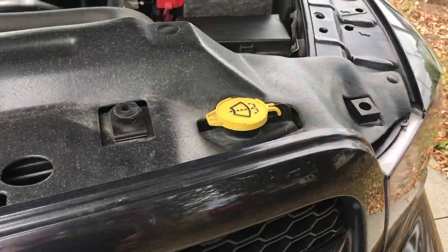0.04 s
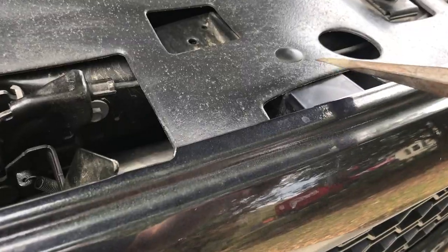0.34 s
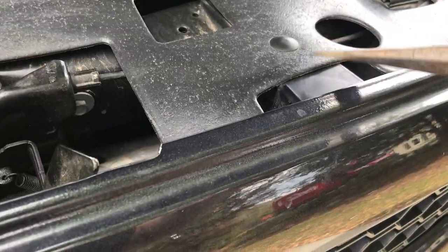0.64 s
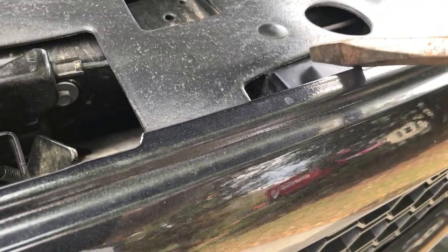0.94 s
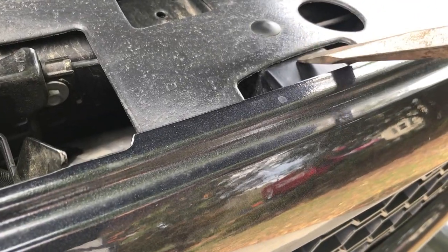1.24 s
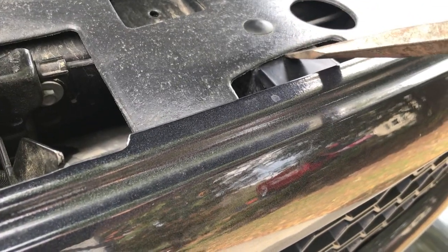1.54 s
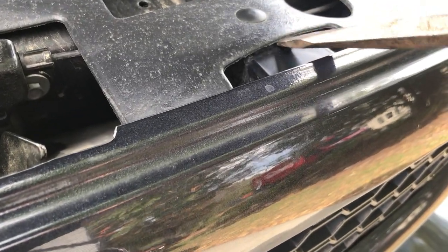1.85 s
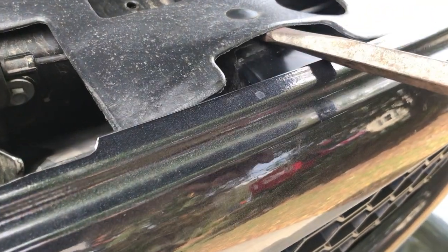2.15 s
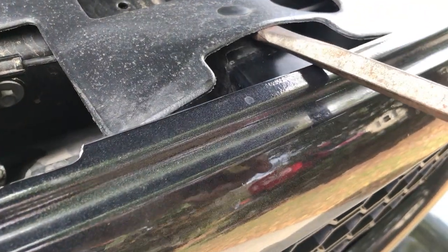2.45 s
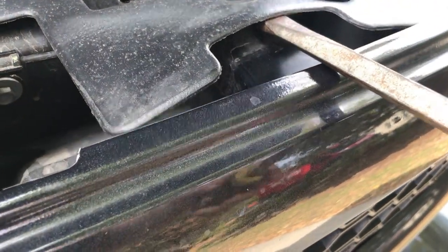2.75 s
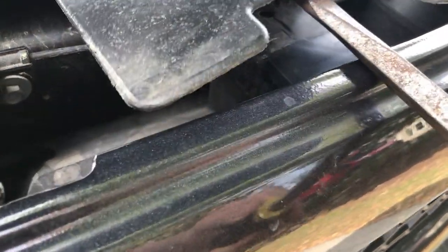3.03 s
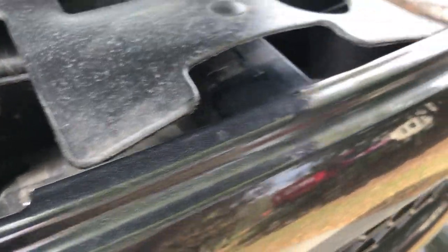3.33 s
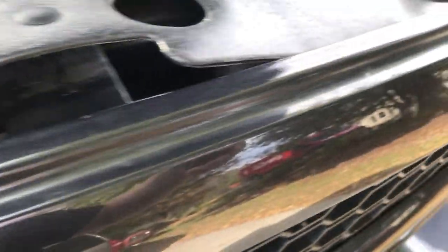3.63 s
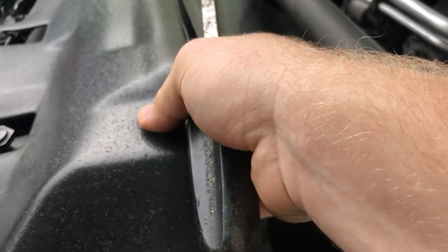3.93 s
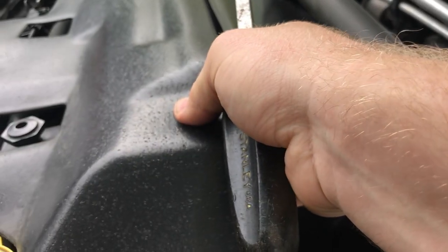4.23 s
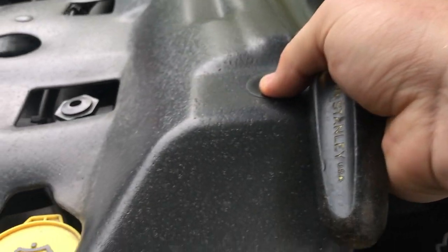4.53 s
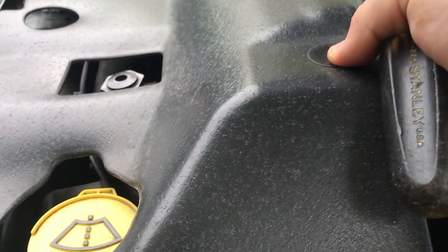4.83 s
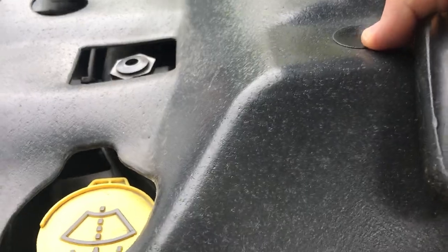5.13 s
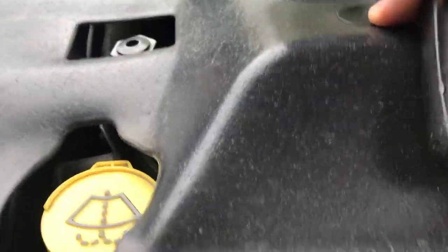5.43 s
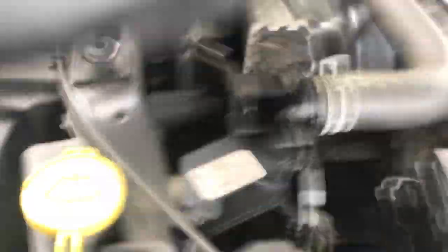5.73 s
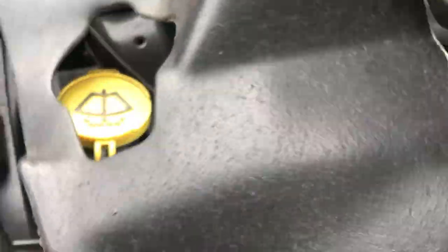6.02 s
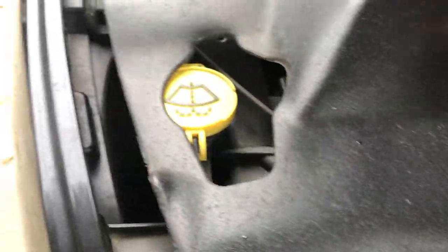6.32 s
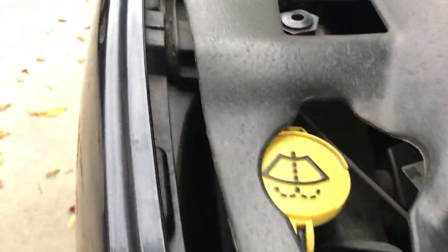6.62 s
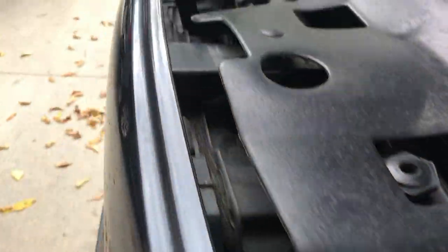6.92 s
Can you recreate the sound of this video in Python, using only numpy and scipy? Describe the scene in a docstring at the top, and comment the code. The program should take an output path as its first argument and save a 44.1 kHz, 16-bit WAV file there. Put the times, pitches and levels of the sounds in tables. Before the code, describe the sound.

Close to the microphone, a screwdriver clacks and lightly scrapes against a plastic cover in a car's engine bay. A clip lets go with a loud snap, and more sharp clicks follow. The panel rumbles as it bends, then is dragged up with loud hollow thumps and a brief squeak, ending in a few more snaps. Soft outdoor air and a faint distant engine drone lie underneath.

```python
"""Sharp clacks, gritty scrapes, snaps and hollow thumps sound close by, over outdoor air and a low drone. A
screwdriver is prying a plastic cover off the front of a car's engine bay. Its blade knocks on the panel, the
clips snap out, and the freed cover is dragged up, booming like a slack drum. The panel rumbles as a hand bends
it; the drone comes from a far engine."""
import sys
import numpy as np
from scipy import signal
from scipy.fft import rfft, irfft
from scipy.io import wavfile
from scipy.ndimage import map_coordinates

SR = 44100
rng = np.random.default_rng(int(sys.argv[2]) if len(sys.argv) > 2 else 0)


def generate_wav(signal):
    """Clip the signal to [-1, 1] and save it as 16-bit WAV at the path in sys.argv[1]."""
    frames = np.transpose(np.atleast_2d(signal))
    scaled = np.clip(frames, -1, 1) * 32767
    pcm = np.round(scaled).astype(np.int16)
    wavfile.write(sys.argv[1], SR, pcm)


N = 307377

# the tones a plastic clip rings with: f/Hz, level/dB, base t60/s (t60 is the time to fade by 60 dB)
CLIP_TONES = [(229.7, -2, 0.12), (356, -3, 0.104), (436, -8, 0.091), (672, -5, 0.0334), (1006, 0, 0.13),
              (1354, 10, 0.04), (1917, -13, 0.11), (2640, 0.5, 0.037), (3230, 5.5, 0.024),
              (4330, -2.5, 0.013)]
# the tone colour of struck plastic: f/Hz, level/dB
PLASTIC_COLOUR = [(60, -2), (150, 1.5), (280, 1.5), (900, 1), (2000, 3), (3800, -2), (5500, -9),
                  (8000, -11.5), (10300, -17.5), (12500, -14), (16000, -25.5)]


def amp(db):
    """Turn decibels into a gain."""
    return 10 ** (np.asarray(db) / 20)


def unit(x):
    """Scale x to an average (rms) strength of 1."""
    return x / np.sqrt(np.mean(x ** 2) + 1e-20)


def along(points, hz):
    """Read between (frequency, value) points on a pitch scale."""
    freqs, values = np.transpose(points)
    return np.interp(np.log(hz + 1), np.log(freqs + 1), values)


def wobble(rate):
    """A smooth curve through rate random points a second."""
    knots = rng.standard_normal(int(N * rate / SR) + 4)
    grid = np.arange(0, len(knots) - 1, 1 / 10)
    return np.interp(np.arange(N) * rate / SR, grid, map_coordinates(knots, [grid]))


def coloured(x, colour):
    """Give x a tone colour, at strength 1."""
    gain = amp(along(colour, np.fft.rfftfreq(len(x), 1 / SR)))
    return unit(irfft(rfft(x) * gain, len(x)))


def noise(colour, size=N):
    """Steady noise with a tone colour."""
    return coloured(rng.standard_normal(size), colour)


def add(track, s, sound):
    """Mix a sound into the track at s seconds."""
    start = round(s * SR)
    track[start:start + len(sound)] += sound[:max(N - start, 0)]


def strokes(rows, rise_db_per_s, fall_db_per_s):
    """A gain curve: each stroke swells, holds for its length and dies away."""
    t = np.arange(N) / SR
    return sum(amp(db - rise_db_per_s * np.clip(s - t, 0, 1)
                   - fall_db_per_s * np.clip(t - s - length, 0, 1)) for s, length, db in rows)


def air():
    """Outdoor air: a rumble, a soft distant wash and a thin hiss, each wavering a little."""
    # tone colours of the three layers: f/Hz, level/dB
    rumble_colour = [(20, -23.5), (40, -3.5), (60, 11), (90, 3), (140, 0.5), (220, -5.5), (320, -13.5),
                     (600, -46.5)]
    wash_colour = [(150, -23), (330, 2.5), (600, -1.5), (1100, 0.5), (1800, -4), (2800, -13.5), (5000, -27)]
    hiss_colour = [(1500, -5), (3000, 2.5), (6000, -0.5), (9000, -5), (10300, -11), (12000, -8),
                   (15500, -19.5), (16300, -30)]
    # the air at each place the microphone stands: start t/s, rumble/dB, wash/dB, hiss/dB
    places = [(0, -53.5, -63, -54), (0.114, -46, -61, -61.5), (3.33, -45.5, -61.5, -64),
              (3.81, -45.5, -55, -60.5), (5.05, -49, -52, -62)]
    starts, *levels = np.transpose(places)
    place = np.searchsorted(starts[1:], np.arange(N) / SR)
    rumble_db, wash_db, hiss_db = np.array(levels)[:, place]
    rumble = amp(rumble_db + 1.1 * wobble(7)) * noise(rumble_colour)
    wash = amp(wash_db + 1.4 * wobble(2.2)) * noise(wash_colour)
    hiss = amp(hiss_db + 1.5 * wobble(9)) * noise(hiss_colour)
    return rumble + wash + hiss


def drone(hz):
    """Only an engine's lowest tones carry this far, each wavering on its own."""
    # engine tones: multiple of the firing rate, level/dB
    tones = [(0.499, -11.5), (1, 0.5), (1.498, -34), (1.75, -14.5), (2, -29.5)]
    phase = 2 * np.pi * np.cumsum(hz * (1 + 0.0159 * wobble(25))) / SR
    return unit(sum(amp(db + 1.64 * wobble(8.3)) * np.sin(k * phase) for k, db in tones))


def far_engine():
    """The revs climb, then sink at a gear change; later the engine holds a higher speed."""
    # pulling and changing gear: t/s, firing f/Hz, level/dB
    revs = [(.14, 108.7, -44.5), (1.5, 117.6, -41.5), (2.6, 130.4, -48), (3.1, 129.2, -46.5),
            (3.4, 104.9, -44), (3.8, 103.3, -37)]
    # steady higher revs: t/s, length/s, firing f/Hz, level/dB
    cruise = (6.5, .55, 171, -52)
    times, *columns = np.transpose(revs)
    hz, db = [np.interp(np.arange(N) / SR, times, column) for column in columns]
    fade = strokes([(times[0], times[-1] - times[0], 0)], rise_db_per_s=500, fall_db_per_s=500)
    pulling = amp(db) * fade * drone(hz)
    s, length, cruise_hz, cruise_db = cruise
    swell = strokes([(s, length, cruise_db)], rise_db_per_s=40, fall_db_per_s=45)
    return pulling + swell * drone(cruise_hz)


def friction(colour, grain_db, catch_db):
    """Countless tiny slips of unequal size, bunched where the surfaces catch."""
    slips = rng.standard_normal(N) * amp(grain_db * wobble(1500) + catch_db * wobble(130))
    return coloured(slips, colour)


def flexing():
    """The panel rumbles as the hand bends it."""
    # bends: t/s, length/s, level/dB
    bends = [(2.84, 0.034, -30.5), (2.99, 0.043, -39), (3.8, .12, -43), (4.04, .01, -38),
             (4.155, .025, -31.5), (4.29, .035, -29), (4.41, 0.045, -40), (4.7, .02, -45),
             (4.94, 0.067, -33.5), (5.15, 0.07, -46.5), (5.46, 0.013, -32.5), (5.56, 0.073, -22.5),
             (5.64, 0.0092, -11), (5.74, 0.012, -17), (5.83, 0.058, -26.5)]
    # their deep tone colour: f/Hz, level/dB
    colour = [(20, -11), (45, 3.5), (80, 5), (130, -1), (200, -3), (330, -13.5), (550, -25.5), (1000, -35),
              (2000, -94)]
    gain = strokes(bends, rise_db_per_s=597, fall_db_per_s=334)
    return gain * friction(colour, grain_db=1, catch_db=3)


def dragging():
    """The cover drags over its seat, plastic on plastic."""
    # slides: t/s, length/s, level/dB
    slides = [(2.845, .045, -30.5), (5.47, 0.014, -37), (5.558, 0.0085, -23.5), (5.624, .011, -20.5),
              (5.684, 0.028, -32), (5.74, 0.0093, -41), (5.98, 0.071, -46.5), (6.17, .1, -49),
              (6.3, .085, -45)]
    # their tone colour: f/Hz, level/dB
    colour = [(150, -27.5), (480, 2), (950, 0), (1250, -0.5), (2000, -6.5), (3100, -9), (5000, -15),
              (9000, -23), (11000, -26.5), (16000, -29)]
    gain = strokes(slides, rise_db_per_s=1101, fall_db_per_s=480)
    return gain * friction(colour, grain_db=4.5, catch_db=3.0)


def scraping():
    """Gritty scrapes, each ringing with a few thin tones."""
    # light scrapes: t/s, length/s, level/dB
    scrapes = [(.085, 0.011, -48.5), (1.42, 0.017, -56), (1.665, 0.048, -61), (1.945, 0.2, -49.5),
               (4.14, 0.14, -61.5), (4.85, 0.085, -60)]
    # the grit's tone colour and the tones it rings with: f/Hz, level/dB
    colour = [(240, -20), (400, 5), (520, 1.5), (570, 4), (742, 2), (1110, 1.5), (1220, -2.5), (1710, -3),
              (2360, -3.5), (5190, -3.5), (6740, -9), (8240, -12), (10100, -14.5), (13300, -13),
              (16000, -18)]
    singing_tones = [(1750, 0), (5330, -2), (8400, -3.5), (13800, -3.5)]
    grit = friction(colour, grain_db=4.0, catch_db=-0.2)
    song = sum(amp(db) * unit(signal.lfilter(*signal.iirpeak(hz, Q=18, fs=SR), grit))
               for hz, db in singing_tones)
    gain = strokes(scrapes, rise_db_per_s=1200, fall_db_per_s=1500)
    return gain * (grit + amp(-6) * unit(song))


def squeaks():
    """Plastic sticks and slips, making rough tones that swell and fade."""
    # chafing spots: t/s, length/s, f/Hz, level/dB
    chafes = [(1.17, .14, 724, -59.5), (1.641, .1, 1740, -62), (4.55, 0.098, 185, -43.5),
              (4.83, 0.091, 515, -56.5), (4.864, 0.075, 2040, -63), (4.865, 0.077, 1470, -58),
              (5.149, 0.029, 428, -46), (5.606, 0.028, 1760, -31), (5.627, 0.019, 1160, -19.5),
              (5.674, 0.046, 2820, -35)]
    track = np.zeros(N)
    for s, length, hz, db in chafes:
        size = round(length * SR)
        tone = signal.lfilter(*signal.iirpeak(hz, Q=13, fs=SR), rng.standard_normal(size))
        add(track, s, amp(db) * unit(np.hanning(size) * tone))
    return track


def dense_ring(t, stretch, bay_db, bay_stretch):
    """The panel's crowded tones, treble dying first, with a weak, slower answer from the engine bay."""
    # how long the plastic rings: f/Hz, base t60/s
    ring_times = [(150, 0.25), (500, 0.13), (1500, 0.086), (4000, 0.054), (8000, 0.05), (15000, .025)]
    hz = np.fft.rfftfreq(len(t), 1 / SR)
    spectrum = np.exp(2j * np.pi * rng.random(len(hz))) * amp(along(PLASTIC_COLOUR, hz))
    centres = np.geomspace(100, 16000, 9)
    ring = np.zeros(len(t))
    for centre, pick in zip(centres, np.eye(len(centres))):
        band = irfft(spectrum * along(np.transpose([centres, pick]), hz), len(t))
        t60 = along(ring_times, centre)
        fade = amp(-60 * t / (t60 * stretch)) + amp(bay_db - 60 * t / (t60 * bay_stretch))
        # each band keeps its fair share of the energy
        ring += unit(band * fade) * np.std(band) * np.sqrt(np.mean(fade ** 2))
    return unit(ring)


def blow(part_tones, stretch, tones_db, crack_db, crack_t60):
    """One hit: the part's strong tones, a brief crack and the dense ring; stretch scales the ring time."""
    t = np.arange(SR // 5) / SR
    stretch = max(stretch, .2)
    hz, db, t60 = np.transpose(part_tones)[:, :, None]
    strength = amp(db + 1.5 * rng.standard_normal(hz.shape)) * rng.choice([-1, 1], hz.shape)
    tones = np.sum(strength * amp(-60 * t / (t60 * stretch)) * np.sin(2 * np.pi * hz * t), axis=0)
    crack = noise(PLASTIC_COLOUR, len(t)) * amp(-60 * t / crack_t60)
    ring = dense_ring(t, stretch, bay_db=-23.5, bay_stretch=2.44)
    return ring + amp(tones_db) * unit(tones) + amp(crack_db) * unit(crack)


def balance(hit, bass_db, middle_db, treble_db):
    """Set how strong a hit's bass, middle and treble are over its first 30 ms."""
    edges_hz = [(150, 500), (500, 4500), (4800, 19000)]
    first = round(.03 * SR)
    bands = [signal.sosfilt(signal.butter(3, e, 'band', fs=SR, output='sos'), hit) for e in edges_hz]
    levels = bass_db, middle_db, treble_db
    return sum(amp(db) * band / np.std(band[:first]) for band, db in zip(bands, levels))


def spot_tone(hz, t60_at_1khz):
    """The tone that one struck spot favours; low ones ring longer."""
    t = np.arange(SR // 5) / SR
    t60 = t60_at_1khz * np.sqrt(1000 / hz)
    tone = np.sin(2 * np.pi * hz * t) * amp(-60 * t / t60) * (1 - np.exp(-t * hz))
    return tone / np.std(tone[:round(.03 * SR)])


def strikes(hits, part_tones, stretch, tones_db, crack_db, crack_t60, spot_t60_at_1khz):
    """All hits on one part; a hit's bass, treble and spot levels are added to its own level."""
    track = np.zeros(N)
    for s, db, bass_db, treble_db, ring_factor, spot_hz, spot_db in hits:
        hit = blow(part_tones, ring_factor * stretch, tones_db, crack_db, crack_t60)
        spot = amp(db + spot_db) * spot_tone(spot_hz, spot_t60_at_1khz)
        add(track, s, balance(hit, db + bass_db, db, db + treble_db) + spot)
    return track


def thumps():
    """The loose cover knocks, then booms like a slack drum at a pitch set by where it is held."""
    # bumps: t/s, knock level/dB, treble above that/dB, boom f/Hz, boom level/dB, boom t60/s
    bumps = [(4.956, -57, -17, 290, -12, 0.014), (5.392, -37.5, -16, 262, -19.5, 0.053),
             (5.5464, -19, -5, 1010, 1, 0.025), (5.551, -30, -2, 284, -16.5, 0.19),
             (5.638, -17, -12, 395, 4.5, 0.055), (5.64, -36, -14, 206, -2.5, 0.055),
             (5.656, -27.5, -5, 420, -3, 0.017), (5.7266, -18, -11.5, 560, 4.5, 0.048),
             (5.7333, -24.5, -16, 166, -7, 0.054), (5.882, -69, -28, 401, -10.5, 0.022)]
    track, t = np.zeros(N), np.arange(SR // 5) / SR
    rise = 1 - np.exp(-t / 0.0012)
    for s, db, treble_db, hz, boom_db, t60 in bumps:
        knock = blow(CLIP_TONES, stretch=0.28, tones_db=-8.5, crack_db=-4.0, crack_t60=0.011)
        boom = np.sin(2 * np.pi * hz * t) * amp(boom_db - 60 * t / t60) * rise
        add(track, s, balance(knock, db - 4.5, db, db + treble_db) + boom)
    return track


def clicks():
    """A stiff clip clicks against the steel blade."""
    # clicks: t/s, level/dB, bass/dB, treble/dB, ring factor, spot f/Hz, spot/dB
    hits = [(3.814, -67, -15, 2, 0.82, 7140, 8), (4.3985, -31.5, -21, 5.5, 1.3, 3300, 6),
            (4.422, -56, 2, 3, 0.71, 800, 9), (4.799, -44, -27, -6.5, 0.76, 2030, -6),
            (4.8325, -39.5, -15, 0, 0.77, 2030, 2), (5.4562, -18, -15, -3.5, 0.79, 3460, -13)]
    # tones of the struck steel: f/Hz, level/dB, base t60/s
    steel_tones = [(267, -7, 0.082), (520, -17, 0.039), (985, 3, 0.013), (1620, -12, 0.036),
                   (3325, 7.5, 0.011), (4550, -3.5, 0.016), (5600, -1, 0.015), (6130, 2.5, 0.0045),
                   (7130, -21.5, 0.0092), (14500, -18, .012)]
    return strikes(hits, steel_tones, stretch=0.94, tones_db=7.5,
                   crack_db=-3.0, crack_t60=0.041, spot_t60_at_1khz=0.023)


def snaps():
    """Clips let go and their barbs flick past the rim."""
    # snaps: t/s, level/dB, bass/dB, treble/dB, ring factor, spot f/Hz, spot/dB
    hits = [(2.8218, -23.5, -8.5, 4, 1.6, 543, -4), (2.8335, -25, -0.5, 0.5, 1.2, 258, -3.5),
            (2.837, -21, -4, -20, 1.9, 1130, -6), (2.887, -39, -9, -14, 0.44, 1245, -15),
            (4.5135, -37.5, -31, -4, 1.1, 3430, -1), (4.519, -25, -4, -5, 1.05, 6170, -7),
            (4.5235, -27, -12, -3.5, 1.45, 232, -7), (5.320, -54.5, 11, -22, 5, 1440, 6),
            (5.975, -50, 1, -16, 0.74, 2450, -25), (6.0123, -30.5, -8.5, -18.5, 0.7, 3564, -12),
            (6.018, -41, 0.5, -35, 2.1, 724, 3.5), (6.1565, -30, -10, -14, .9, 1810, -7),
            (6.162, -27, -7.5, -15, 1.07, 2800, -6), (6.2268, -34.5, -1, -5.5, 0.95, 3900, -5),
            (6.2373, -22.5, -6, -10.5, 0.96, 3710, -3.5), (6.297, -37.5, -0.5, -17, 1.2, 855, -9),
            (6.379, -50, -6, -23, 0.21, 3830, -6.5)]
    return strikes(hits, CLIP_TONES, stretch=1.0, tones_db=-2.5,
                   crack_db=2, crack_t60=0.022, spot_t60_at_1khz=0.019)


def pries():
    """The blade levers and slips, clacking on the cover."""
    # clacks: t/s, level/dB, bass/dB, treble/dB, ring factor, spot f/Hz, spot/dB
    hits = [(.131, -45.5, -20, -3.5, 0.91, 2700, -10), (.143, -46, -29, -6.5, 0.72, 1900, -24),
            (.7675, -24.5, -7.5, -9.5, 0.65, 2210, -3.5), (.772, -28, -4.5, -34, 1.2, 593, -5.5),
            (.921, -34, -3, -12.5, 0.53, 2175, 6.5), (.925, -31, -1.5, -27.5, 1.53, 620, -5),
            (1.144, -48.5, 2.5, -11, 1.5, 700, 0.5), (1.429, -55.5, 3, -17, 0.81, 1730, -12),
            (2.148, -42.5, -5.5, -24, 1, 1310, -3), (2.363, -48.5, 9, -5.5, 1.6, 321, 9),
            (2.522, -53, -4, -14.5, 1.3, 1987, -12), (2.594, -37, -21, -14, 1.1, 1940, -1),
            (2.748, -38, -17, -16.5, 1.46, 2000, -1), (2.7855, -17.5, -6.5, -15.5, 0.64, 376, -7),
            (2.789, -17.5, -9.5, -16, 1.08, 782, -7.5), (3.169, -44, 4.5, -11.5, 1.8, 711, 4.5),
            (3.2545, -33, -6.5, -18, 0.92, 2150, -6)]
    # tones of the cover: f/Hz, level/dB, base t60/s
    cover_tones = [(282.4, 2, 0.11), (563, -3, 0.053), (728, -4, 0.091), (1142, -9, 0.13),
                   (1407, -3.5, 0.071), (1844, 3, 0.051), (2266, -7.5, 0.05), (3220, -5.5, 0.02)]
    return strikes(hits, cover_tones, stretch=0.99, tones_db=1.0,
                   crack_db=-1, crack_t60=0.032, spot_t60_at_1khz=0.038)


def scene():
    """Tool, clips and cover in the open air, in mono."""
    hits = pries() + snaps() + clicks() + thumps()
    rubbing = scraping() + dragging() + flexing() + squeaks()
    return (hits + rubbing + far_engine() + air())[None]


def record(dry):
    """The deepest bass and highest treble are cut; loud hits dip the gain and their peaks flatten."""
    low_hz, top_hz = 30.2, 16300
    knee_db, lag_s = -10, 0.03  # around this level the gain dips, this slowly
    x = signal.sosfilt(signal.butter(3, low_hz, 'high', fs=SR, output='sos'), dry)
    memory = np.exp(-1 / (lag_s * SR))
    power = x ** 2
    for _ in range(2):
        power = signal.lfilter([1 - memory], [1, -memory], power)
    dipped = x / np.sqrt(1 + power / amp(knee_db) ** 2)
    flattened = dipped / (1 + np.abs(dipped) ** 8) ** (1 / 8)
    return irfft(rfft(flattened) * (np.fft.rfftfreq(N, 1 / SR) < top_hz), N)


dry = scene()
out = record(dry)
generate_wav(out)
```